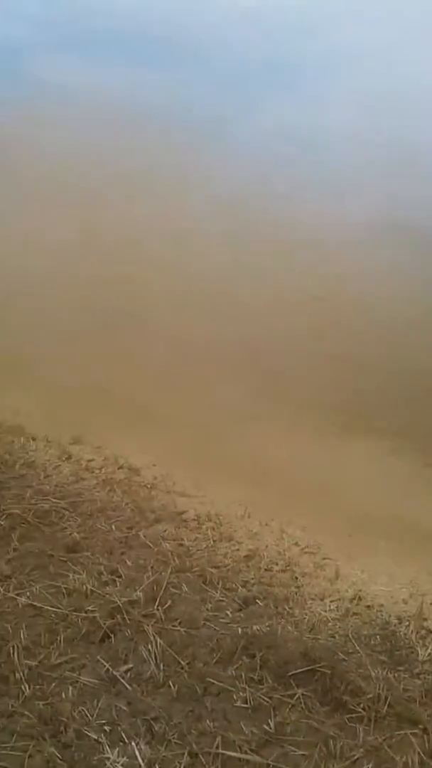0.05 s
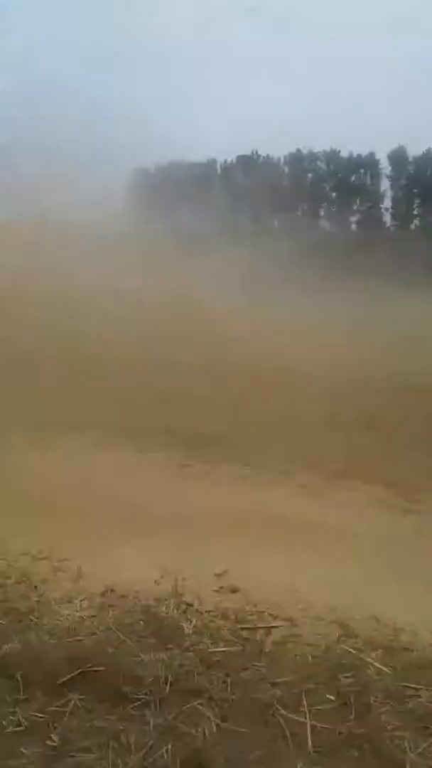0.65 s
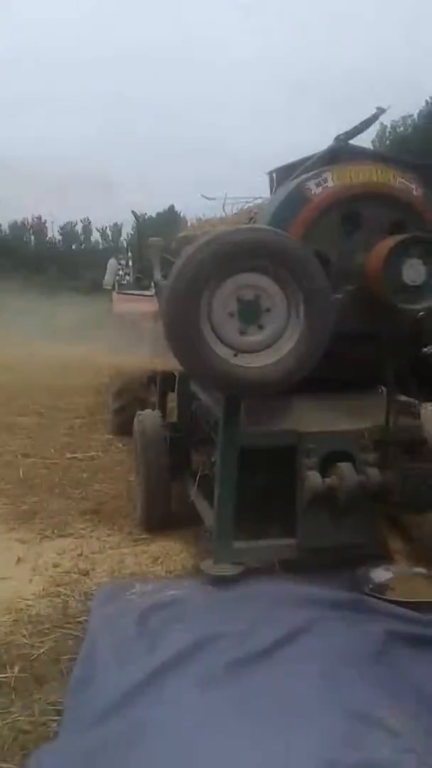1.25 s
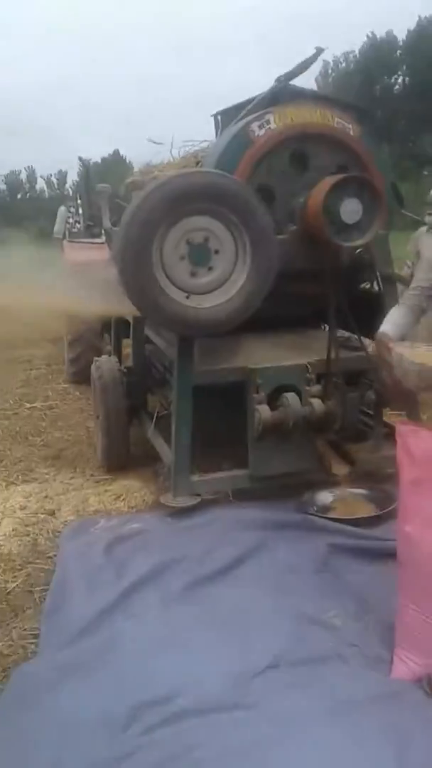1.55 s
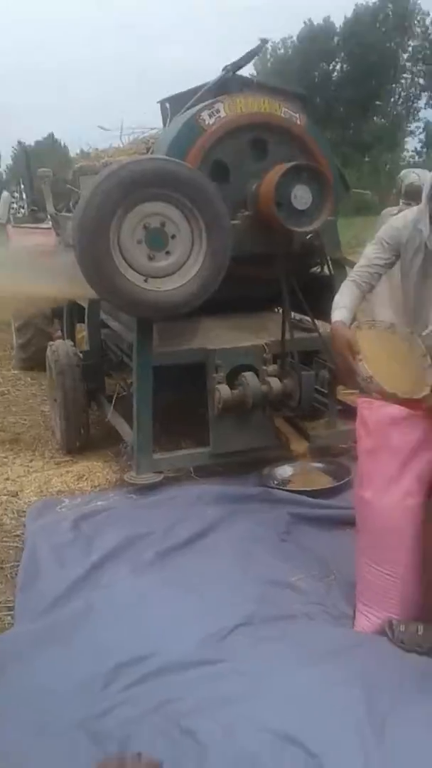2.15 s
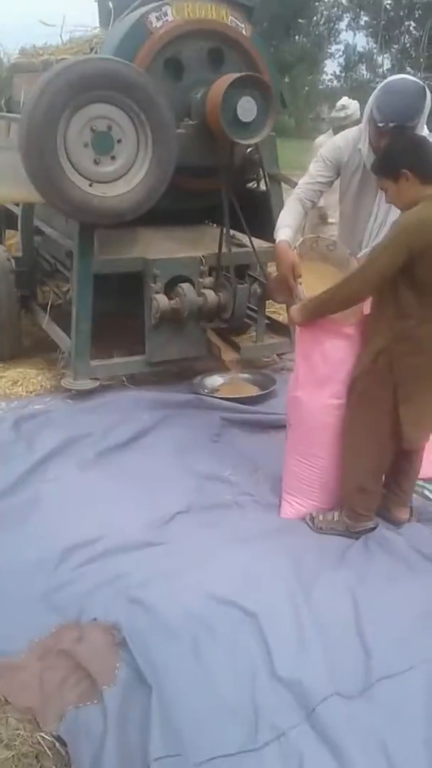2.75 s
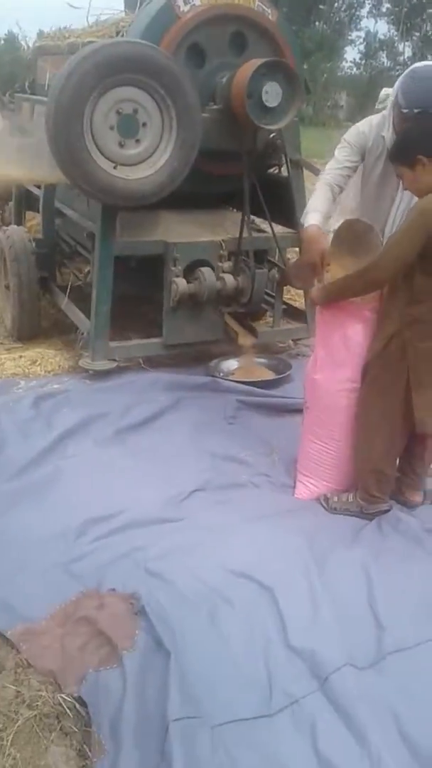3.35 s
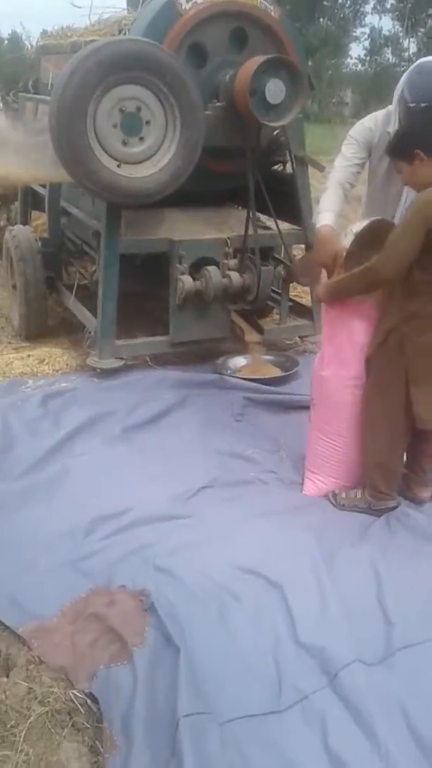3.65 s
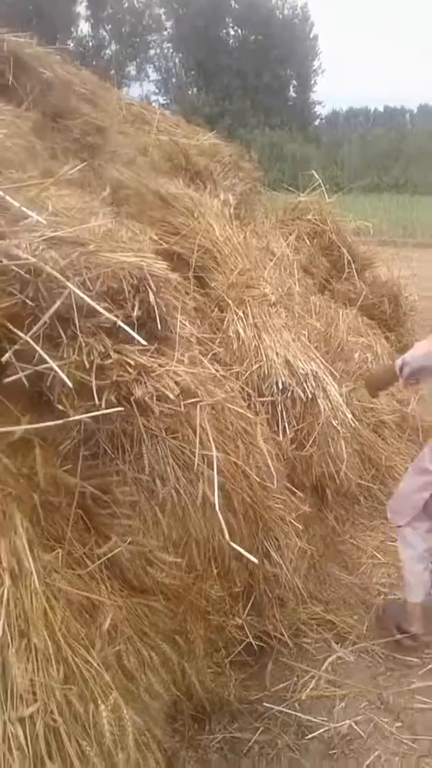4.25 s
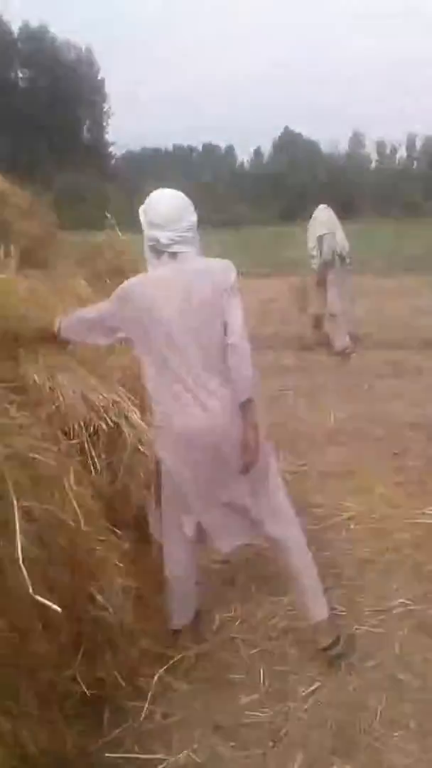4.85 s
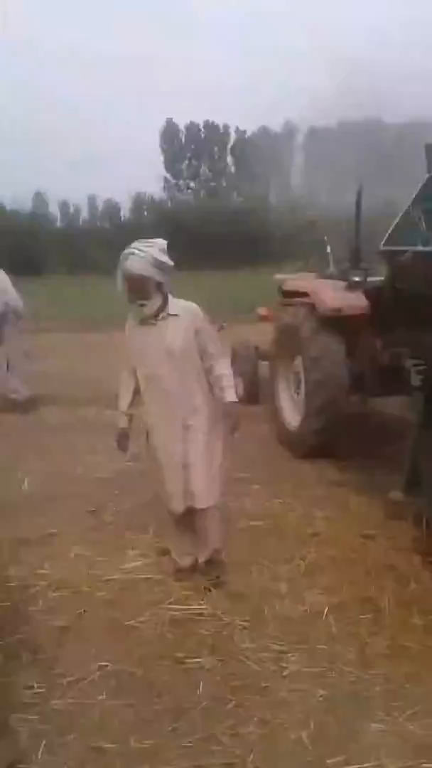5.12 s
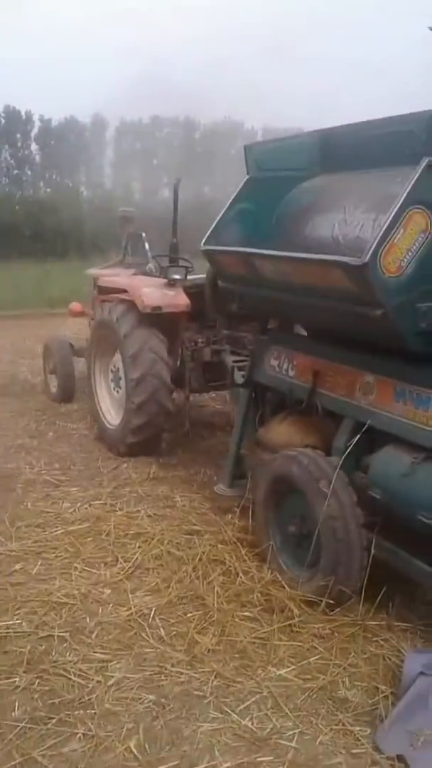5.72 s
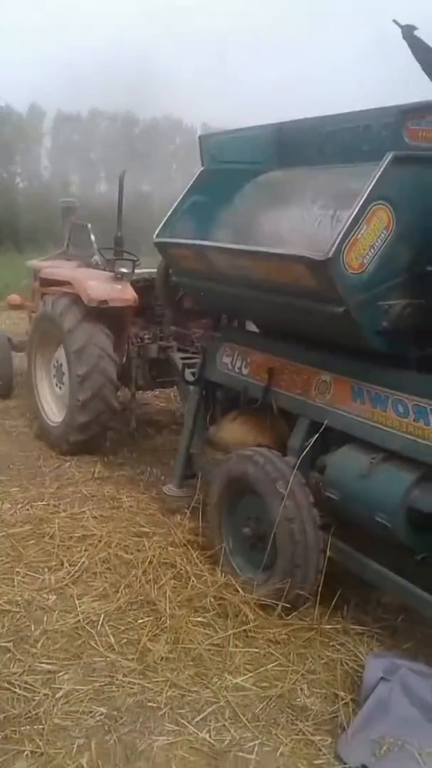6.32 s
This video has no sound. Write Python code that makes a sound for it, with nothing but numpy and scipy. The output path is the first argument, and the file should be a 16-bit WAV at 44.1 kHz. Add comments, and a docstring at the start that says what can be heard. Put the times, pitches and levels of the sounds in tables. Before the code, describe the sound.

A tractor's diesel engine drones steadily in an open field, driving a threshing machine. The drum hums and pounds its steel housing while grain rattles and chopped straw hisses, with brief crackles of shattering stalks. The engine sags under load, and the sound cuts out for a moment. It returns with a brighter hiss, and a dry joint gives a few short high squeaks. The tone shifts as the nearby microphone turns.

```python
"""A tractor's diesel drones and barks in an open field, driving a wheat thresher and sagging under load.
The drum's beaters hum and pound a sheet-steel housing, grain rattles, chopped straw hisses out of
the blower, wads of stalks shatter and a dry joint squeaks. One microphone turns from the chaff plume
to the bagging end, pauses, then turns from the straw stack to the feeding side."""
import sys
import numpy as np
from scipy import signal
from scipy.fft import rfft, irfft, next_fast_len
from scipy.io import wavfile
from scipy.ndimage import uniform_filter1d, map_coordinates

SR = 44100
rng = np.random.default_rng(int(sys.argv[2]) if len(sys.argv) > 2 else 0)


def log_audio(samples):
    """Write samples as a 16-bit WAV file to the path given in sys.argv[1]."""
    # one column per channel
    frames = np.atleast_2d(samples).T
    # limit to full scale, then quantise
    limited = np.clip(frames, -1, 1)
    pcm = np.round(limited * 32767).astype(np.int16)
    wavfile.write(sys.argv[1], SR, pcm)


N = 285768
TIME = np.arange(N) / SR
BEATS_PER_FIRING, FAN_PER_FIRING = .7784, 5 / 3
PAUSE_S, RESUME_S = 3.898, 4.275


# Exhaust tones. Each row: multiple of the firing rate, relative dB at the plume, bags, stack and feed.
EXHAUST_TONES = [(1, -36.5, -40.5, -40, -39), (2, -34.5, -32, -33, -32), (2.5, -45, -42.5, -45, -61),
                 (3, -37, -35, -43, -38.5), (4, -25, -33.5, -39.5, -34.5), (5, -28, -33.5, -33, -31.5),
                 (6, -38.5, -50.5, -38, -32.5), (7, -33.5, -37.5, -33.5, -34), (8, -30, -41, -29, -33.5)]

def diesel(firings):
    """The exhaust pulses drone low and bark harder under strain; a belt-driven fan adds its note."""
    exhaust = np.array(EXHAUST_TONES)
    deep = exhaust[:, 0] < 3.5
    drone = tones(exhaust[deep], firings, waver_db=1.46, drift=.09)
    bark = tones(exhaust[~deep], firings, waver_db=1.5, drift=.17)
    fan = amp(-43.5) * tone(FAN_PER_FIRING * firings, waver_db=-5.5, drift=.2)
    return amp(level_db("drone")) * (drone + fan) + amp(level_db("bark") + 7 * strain()) * bark


# Engine speed. Each row: time in seconds, firing rate in Hz.
ENGINE_SPEED = [(0, 52.3), (.4, 52.22), (.85, 51.5), (1.2, 50.6), (1.45, 50.45), (1.8, 50.9), (2.2, 51.24),
                (2.7, 51.18), (2.9, 50.8), (3.55, 48.3), (3.9, 48.2), (4.3, 51.4), (4.6, 51.6),
                (5.1, 52.15), (5.45, 52.08), (5.8, 51.4), (6.1, 51), (6.48, 51.15)]

def firing_hz(lag_s=0):
    """How fast the cylinders fire, or fired lag_s earlier."""
    return np.interp(TIME - lag_s, *np.transpose(ENGINE_SPEED))


def strain(full_hz_per_s=2.7, smooth_s=.42):
    """How hard the engine labours, 0-1: straw in the drum drags its speed down."""
    slowing = -np.gradient(firing_hz()) * SR
    return uniform_filter1d(np.clip(slowing / full_hz_per_s, 0, 1), int(smooth_s * SR))


# Drum tones. Each row: multiple of the beater rate, level in dB at the plume, bags, stack and feed.
DRUM_TONES = [(11, -41.5, -43, -39, -51.5), (13, -30, -42, -35, -46.5), (14, -38.5, -35.5, -52, -43),
              (15, -34.5, -36.5, -38.5, -32), (16, -42.5, -32.5, -43, -58), (17, -49, -27, -41, -30),
              (18, -45.5, -42, -44.5, -33), (19, -42, -41, -37.5, -39.5), (20, -32, -31, -45, -31.5)]
# Swells of the drum's hum. Each row: centre in seconds, rise in dB, half length in seconds.
DRUM_SWELLS = [(.18, 4.5, 0.079), (.8, 9, 0.24), (1.31, 9.5, .11), (1.81, 12, .12), (2.28, 11.5, 0.28),
               (2.7, 10, 0.085), (3.33, 9.5, 0.052), (6.05, 6, 0.096)]

def drum(beats, hum_order=7, housing_share=.13):
    """The beaters pump air, which hums, and pound the housing, which booms."""
    swell_db = swells(DRUM_SWELLS)
    hum_db = level_db("hum") + swell_db + .9 * wobble(45)  # passing straw roughens the hum
    hum = amp(hum_db) * tone(hum_order * beats, waver_db=-.3, drift=.37)
    boom_db = level_db("boom") + housing_share * swell_db + 3 * strain()
    pounding = rng.standard_normal(N) * blows(beats, depth=.32, uneven_db=8.5)
    boom = amp(boom_db) * radiated(pounding, 160, 403)
    return hum + boom + tones(DRUM_TONES, beats, waver_db=2.5, drift=.4)


def blows(beats, depth, uneven_db):
    """Envelope of the beaters: each bites a different wad of straw, then fades within its cycle."""
    bite = amp(uneven_db * np.clip(rng.standard_normal(512), -1.8, 1.8))
    return unit(1 + depth * bite[beats.astype(int)] * (1 - beats % 1) ** 2)


def stalks(beats):
    """Stalks thrash the sheet steel, which roars."""
    thrashing = rng.standard_normal(N) * blows(beats, depth=.35, uneven_db=5.5)
    return amp(level_db("roar")) * radiated(thrashing, 397, 1225)


def kernels(beats):
    """Kernels pelt the steel in fluttering clumps: a clatter and a brighter rattle, returned apart."""
    impacts = grains(rate=4000, spread_db=.6) + 1.25 * rng.standard_normal(N)
    impacts *= amp(.6 * wobble(20) + .38 * wobble(110))
    impacts *= blows(beats, depth=.15, uneven_db=1.5)
    clatter_db = level_db("clatter") + crop_swell_db(share=.42) + turning_db()
    rattle_db = level_db("rattle") + crop_swell_db(share=.62)
    clatter = amp(clatter_db) * radiated(patchy(impacts, depth_db=1.5), 1060, 2190)
    rattle = amp(rattle_db) * radiated(patchy(impacts, depth_db=2), 2720, 4070)
    return clatter, rattle


# The hiss from behind the machine, the stack and the feed. Each row: frequency in Hz, relative gain in dB.
STRAW_REAR = [(2060, -36), (3500, 0.5), (4470, -8), (4780, -6), (5590, -5), (6420, -6.5), (7270, -12.5),
              (10500, -20.5), (11800, -18), (13200, -21.5), (15100, -16), (15600, -22.5)]
STRAW_STACK = [(2060, -38), (3500, -7), (4040, -4.5), (4550, -1.5), (5090, -3), (5700, -2.5), (6920, -8.5),
               (8190, -18), (11300, -17), (13200, -22.5), (15600, -20.5)]
STRAW_FEED = [(2060, -26), (3500, 4.5), (4670, -8), (5990, -3), (7230, -10.5), (10100, -18.5),
              (11700, -16.5), (15600, -16.5)]

def blower():
    """Chopped straw rushes through the sieves and the blower with a fluttering hiss."""
    chaff = grains(rate=6000, spread_db=2) + 1.7 * rng.standard_normal(N)
    chaff *= amp(.44 * wobble(25) + .69 * wobble(90))
    spectra = (STRAW_REAR, STRAW_REAR, STRAW_STACK, STRAW_FEED)
    hiss = radiated(patchy(chaff, depth_db=1.1), 4500, 20000, spectra)
    return amp(level_db("hiss") + crop_swell_db(share=.53)) * hiss


# Brief swells of hiss, rattle and clatter, each layer taking a share of the rise.
# Each row: centre in seconds, full rise in dB, half length in seconds.
CROP_SWELLS = [(1.02, 5, 0.13), (3.1, 2, .25), (6.42, 3.6, 0.19)]

def crop_swell_db(share):
    """The microphone sweeps past the blower's outlet; later, more straw passes through."""
    return share * swells(CROP_SWELLS)


# Wads in the drum. Each row: centre in seconds, level in dB, upper band edge in Hz.
STALK_WADS = [(.028, -28.5, 4000), (0.88, -29, 7000), (1.185, -31.5, 4000), (1.35, -28, 3960),
              (1.5, -25, 4000), (1.659, -31.5, 12000), (2.078, -30, 4000), (2.684, -26, 4000),
              (2.835, -28, 7980)]

def wads(half_length_s=.017):
    """A tough wad of stalks shatters in a short bright surge of splinters."""
    splinters = patchy(grains(rate=5600, spread_db=2.5), depth_db=2.5)
    out = np.zeros(N)
    for s, db, top_hz in STALK_WADS:
        fall_db = np.minimum(9 * ((TIME - s) / half_length_s) ** 2, 120)
        burst = filtered(splinters, lambda hz: band(hz, 1500, top_hz, order=8) / np.sqrt(hz))
        out += amp(db - fall_db) * unit(burst)
    return out


# Slips of the joint. Each row: centre in seconds, peak level in dB, pitch in Hz.
JOINT_SLIPS = [(3.44, -27, 3220), (4.861, -21, 3260), (5.034, -16, 3310), (5.875, -9.5, 3190),
               (6.0358, -13, 3230)]

def squeaks(swell_s=.004, tail_t60_s=.19):
    """A dry joint slips for a few milliseconds; the steel around it rings on faintly."""
    out = np.zeros(N)
    for s, db, hz in JOINT_SLIPS:
        t = TIME - s
        slip = np.exp(-(t / swell_s) ** 2) * np.sin(2 * np.pi * hz * t + .4 * wobble(600))
        ring = unit(filtered(rng.standard_normal(N), lambda f: 1 / (1 + ((f - hz) / 130) ** 2)))
        tail = amp(-9 - 60 * abs(t) / tail_t60_s) * (t > 0) / 2
        out += amp(db) * (slip + tail * ring)
    return out


# The engine's low noise. Each row: frequency in Hz, relative gain in dB.
RUMBLE_SPECTRUM = [(20, -23), (35, -18.5), (60, -11.5), (90, -6), (140, -5.5), (170, -5.5), (230, -27.5),
                   (500, -102.5)]

def rumble():
    """A steady engine rumble lies under everything, the same at every place."""
    return amp(-35.5) * unit(filtered(rng.standard_normal(N), lambda hz: colour(RUMBLE_SPECTRUM, hz)))


# The thresher's colour from each place. Each row: frequency in Hz, relative gain in dB.
AT_PLUME = [(71, -58), (120, -10), (129, -31), (198, -9), (234, -5), (276, -5.5), (386, -16), (410, -12),
            (617, -4.5), (787, -8.5), (988, -19), (1050, -14.5), (1360, -19.5), (4500, -43.5),
            (5850, -66.5), (9900, -120)]
AT_BAGS = [(71, -49), (120, -15), (173, -17), (201, -4.5), (230, -7), (276, -1.5), (317, -6.5),
           (477, -13.5), (656, -9), (799, -6.5), (1180, -18), (1510, -18), (1840, -22.5), (2170, -21),
           (4500, -28.5), (5850, -65.5), (9900, -120)]
AT_STACK = [(120, -15.5), (170, -13), (260, -4.5), (340, -4.5), (420, -4), (520, -5), (660, -14),
            (830, -6.5), (1200, -11), (2000, -13), (2600, -21.5), (3200, -29.5), (3800, -23), (4500, -25)]
AT_FEED = [(71, -43), (120, -16), (129, -27), (198, 3.5), (252, 0), (410, -5), (515, -6), (590, -4.5),
           (799, 2.5), (1100, -9.5), (1400, -8), (2900, -20.5), (3220, -22), (4500, -26), (5850, -59),
           (9900, -120)]

def radiated(x, lo_hz, hi_hz, spectra=(AT_PLUME, AT_BAGS, AT_STACK, AT_FEED)):
    """One band of x, in the colour of the place that the microphone faces."""
    return sum(share * unit(filtered(x, lambda hz: colour(spectrum, hz) * band(hz, lo_hz, hi_hz)))
               for share, spectrum in zip(facing(), spectra))


def patchy(x, depth_db):
    """Each spray of crop hits another panel, which lifts its own narrow band for a moment."""
    spectrum = signal.stft(x, nperseg=512)[2]
    patches = uniform_filter1d(rng.standard_normal(spectrum.shape), 5, axis=0)  # across frequency
    patches = uniform_filter1d(patches, 7, axis=1)  # across time
    return unit(signal.istft(spectrum * amp(depth_db * unit(patches)), nperseg=512)[1][:N])


# The balance at the microphone. Each entry: layer, gain in dB at the plume, bags, stack and feed.
LAYER_DB = {"drone": (0.78, 1.65, -.2, -.6), "bark": (-3.5, -3.5, 2.5, -1.5), "hum": (-26, -32.5, -32, -33),
            "boom": (-23.8, -26.8, -24.2, -25.5), "roar": (-19.5, -22.5, -20, -20),
            "clatter": (-23.5, -27.9, -22, -24.5), "rattle": (-34.5, -35, -30.5, -29),
            "hiss": (-36.3, -35, -26.5, -29)}
# Bogging down. Each entry: layer, change in dB for each Hz of firing rate lost.
BOG_DB_PER_HZ = {"drone": -2.5, "bark": 0.2, "clatter": 1.17, "rattle": -2.2}

def level_db(layer, bog_below_hz=50.7):
    """A layer's level follows the place, and shifts a moment after the engine bogs down."""
    lost_hz = np.maximum(bog_below_hz - firing_hz(lag_s=.21), 0)
    return by_place(LAYER_DB[layer]) + BOG_DB_PER_HZ.get(layer, 0) * lost_hz


def reflected(x, lag_ms=(.49, 1.311, .75, 1.4), strength=(.36, .35, .15, .14), dull_hz=3500):
    """A close reflection, different at each place, combs the sound; its notches slide in the turns."""
    dulled = filtered(x, lambda hz: 1 / (1 + (hz / dull_hz) ** 2))
    echo = np.interp(TIME - by_place(lag_ms) * 1e-3, TIME, dulled)
    return unit(x + by_place(strength) * echo) * np.std(x)


# Microphone turns, plume to bags, then stack to feed.
# Each row: start and end in seconds, change of the clatter midway in dB.
MIC_TURNS = [(.52, 1.24, -5.5), (4.9, 5.48, 0.3)]

def facing():
    """How squarely the microphone faces the plume, bags, stack and feed, each 0-1."""
    to_bags, to_feed = (ramp(start, end) for start, end, _ in MIC_TURNS)
    early = TIME < PAUSE_S
    return np.array([early * (1 - to_bags), early * to_bags, ~early * (1 - to_feed), ~early * to_feed])


def turning_db():
    """The clatter dips midway through the first turn and barely lifts in the second."""
    return sum(db * np.sin(np.pi * ramp(start, end)) for start, end, db in MIC_TURNS)


def by_place(values):
    """One value for each place, blended as the microphone turns."""
    return np.asarray(values) @ facing()


def tone(cycles, waver_db, drift):
    """A sine of rms 1 locked to a shaft, unsteady in level and in phase (drift, radians)."""
    phase = 2 * np.pi * (cycles + rng.random()) + drift * wobble(11)
    return unit(amp(waver_db * wobble(9)) * np.sin(phase))


def tones(table, cycles, waver_db, drift):
    """Orders of a shaft; each carries differently to each place."""
    return sum(by_place(amp(place_db)) * tone(order * cycles, waver_db, drift)
               for order, *place_db in table)


def grains(rate, spread_db):
    """Tiny random impacts of uneven size, about rate a second, rms 1."""
    hits = rng.random(N) < rate / SR
    return unit(hits * rng.standard_normal(N) * amp(spread_db * np.clip(rng.standard_normal(N), -2, 2)))


def swells(rows):
    """A bell-shaped rise and fall in dB for each row."""
    return sum(db * np.exp(-((TIME - s) / half_length) ** 2) for s, db, half_length in rows)


def wobble(rate):
    """A smooth random curve, rate knots a second."""
    return map_coordinates(rng.standard_normal(int(N * rate / SR) + 4), [TIME * rate])


def filtered(x, response):
    """x shaped by a gain that depends on frequency."""
    size = next_fast_len(N + 8192)
    return irfft(rfft(x, size) * response(np.fft.rfftfreq(size, 1 / SR) + 1e-3), size)[:N]


def colour(points, hz):
    """Gain through (Hz, dB) points on a log axis."""
    point_hz, db = np.transpose(points)
    return amp(np.interp(np.log(hz), np.log(point_hz), db))


def band(hz, lo_hz, hi_hz, order=12):
    """Steep band-pass gain."""
    return ((1 + (lo_hz / hz) ** order) * (1 + (hz / hi_hz) ** order)) ** -.5


def ramp(start, end):
    return np.clip((TIME - start) / (end - start), 0, 1)


def amp(db):
    return 10 ** (np.asarray(db) / 20)


def unit(x):
    return x / np.sqrt(np.mean(x ** 2) + 1e-20)


def scene():
    """The drive ties the drum to the engine, so their tones sag together under load."""
    firings = np.cumsum(firing_hz()) / SR
    beats = BEATS_PER_FIRING * firings
    machine = diesel(firings) + rumble() + drum(beats)
    roar = stalks(beats)
    clatter, rattle = kernels(beats)
    crop = reflected(roar + clatter) + rattle + blower()
    return (machine + crop + squeaks() + wads())[None]


def record(dry, ceiling=.7, top_hz=15750):
    """The microphone cuts out for the pause and fades back up; peaks round off, the top treble is cut."""
    fade_db = np.interp(TIME - RESUME_S, [0, .06, .12, .22], [-16.5, -9, -5.5, 0])
    gated = dry[0] * ((TIME < PAUSE_S) + (TIME >= RESUME_S) * amp(fade_db))
    rounded = gated / (1 + abs(gated / ceiling) ** 6) ** (1 / 6)
    return filtered(rounded, lambda hz: hz < top_hz)[None]


dry = scene()
out = record(dry)
log_audio(out)
```